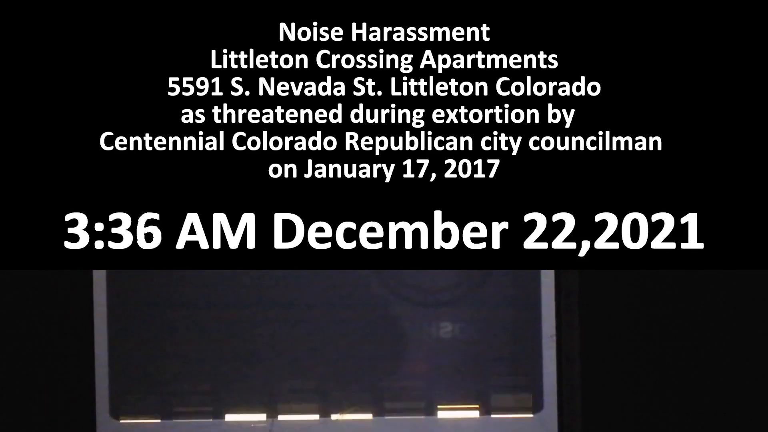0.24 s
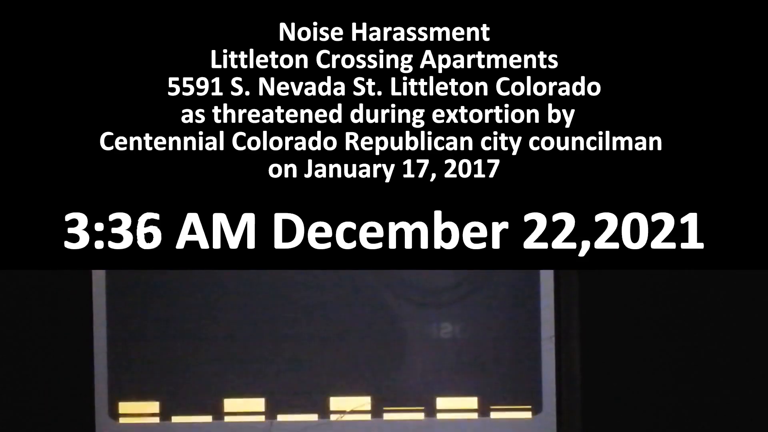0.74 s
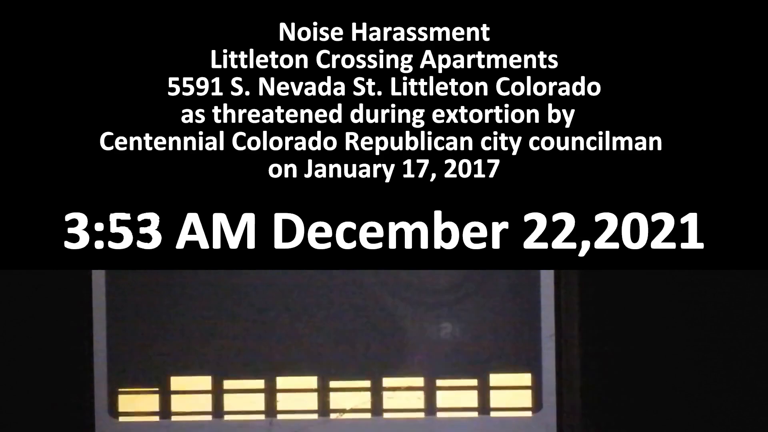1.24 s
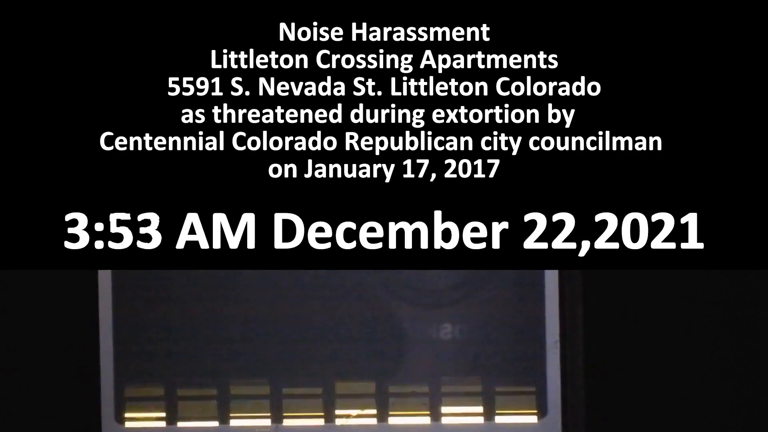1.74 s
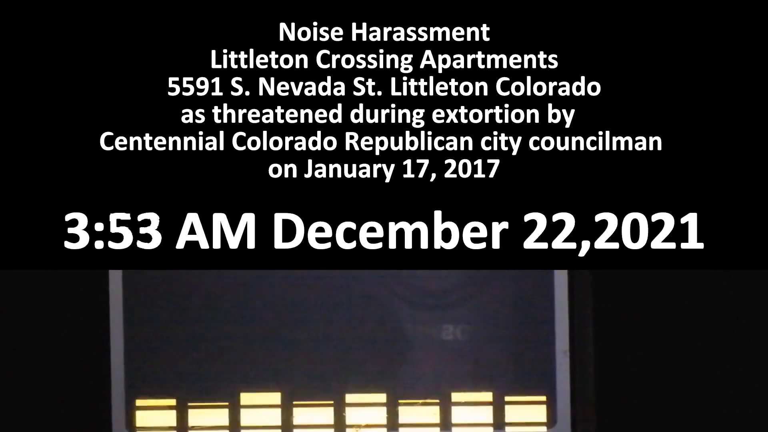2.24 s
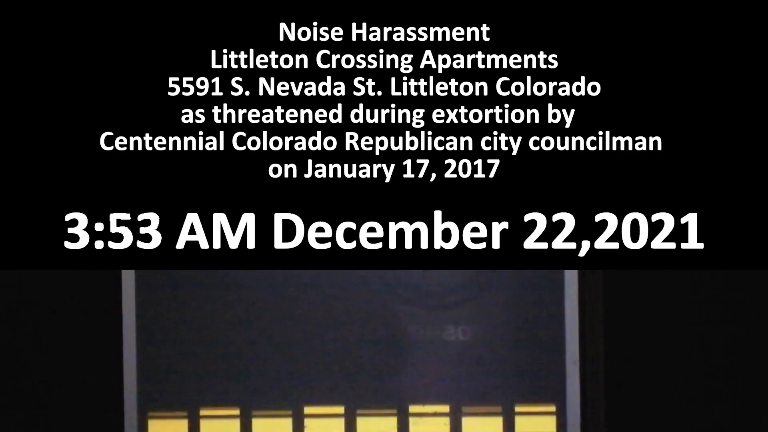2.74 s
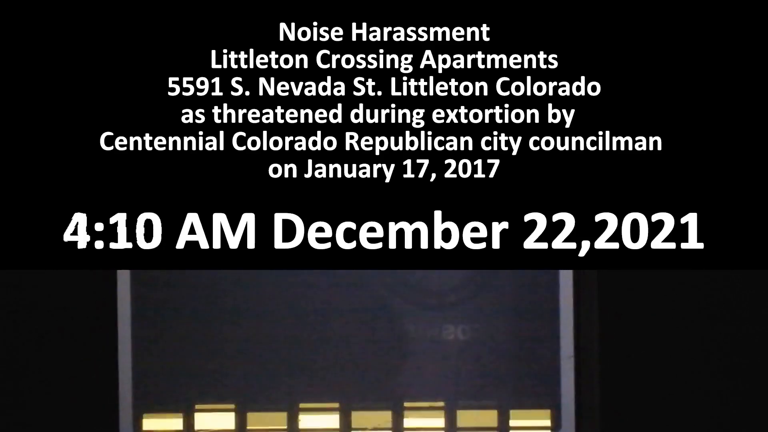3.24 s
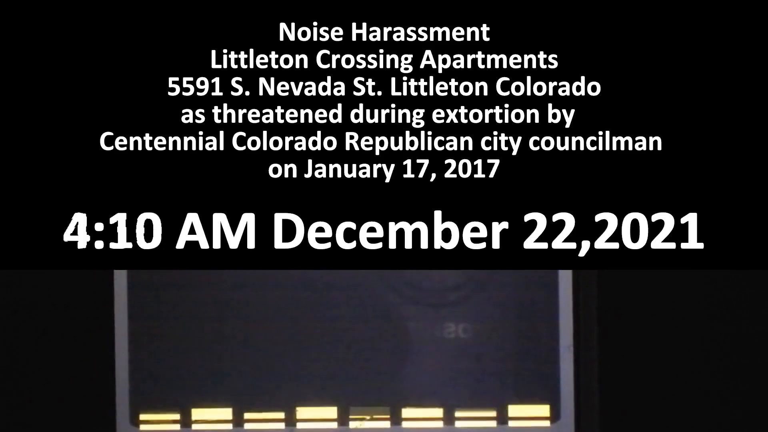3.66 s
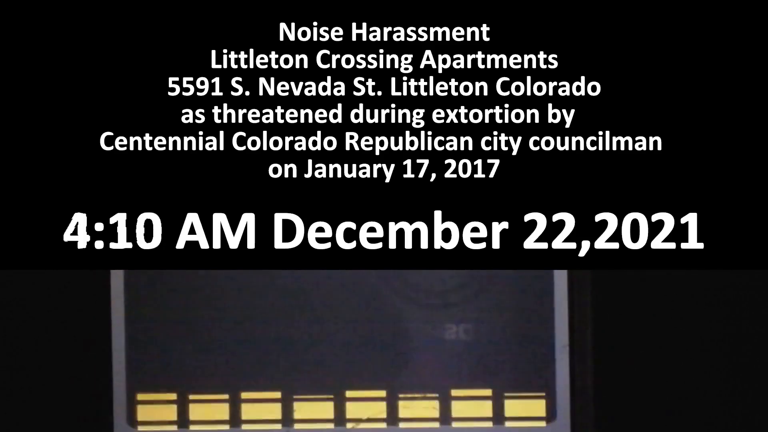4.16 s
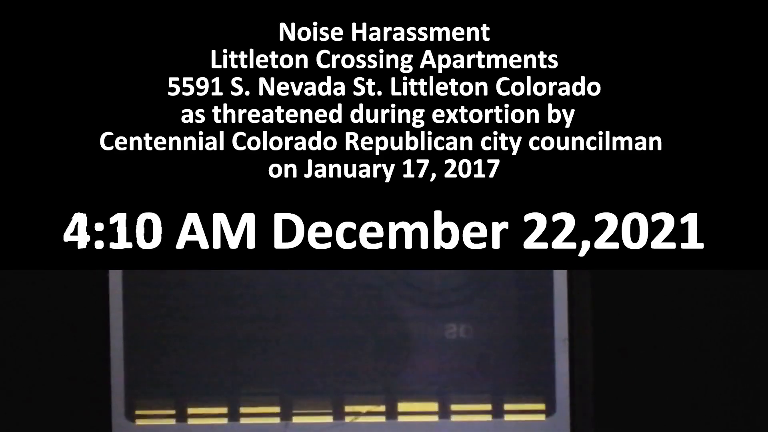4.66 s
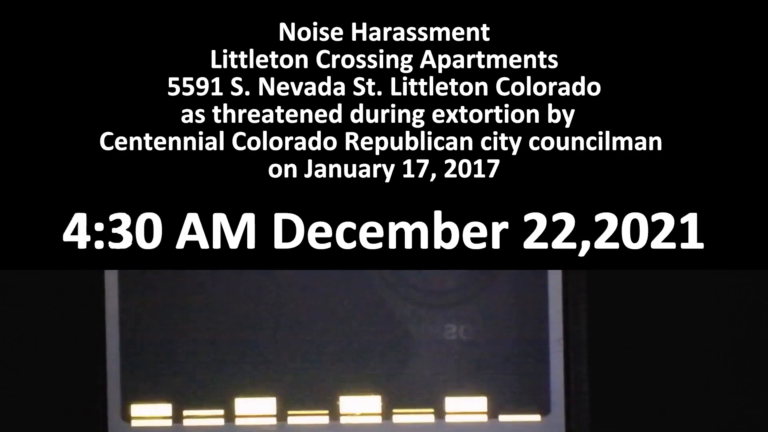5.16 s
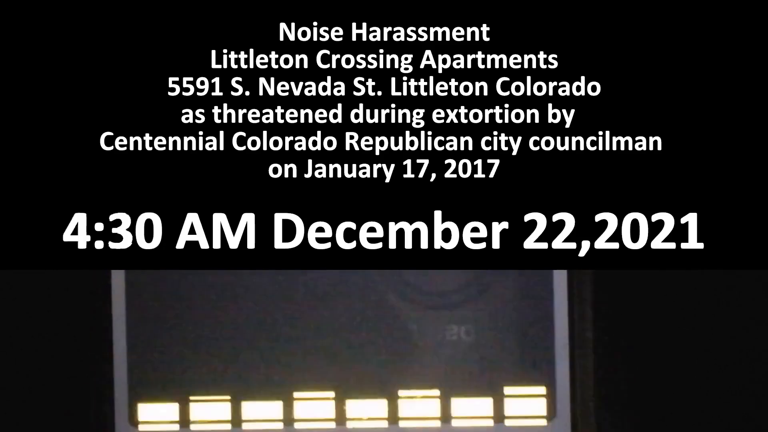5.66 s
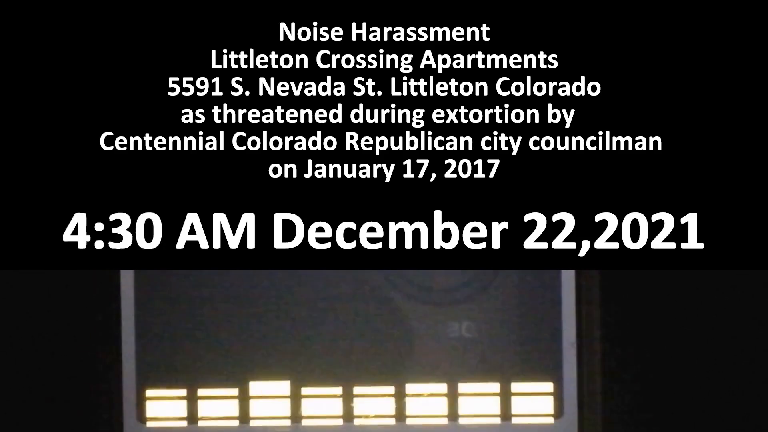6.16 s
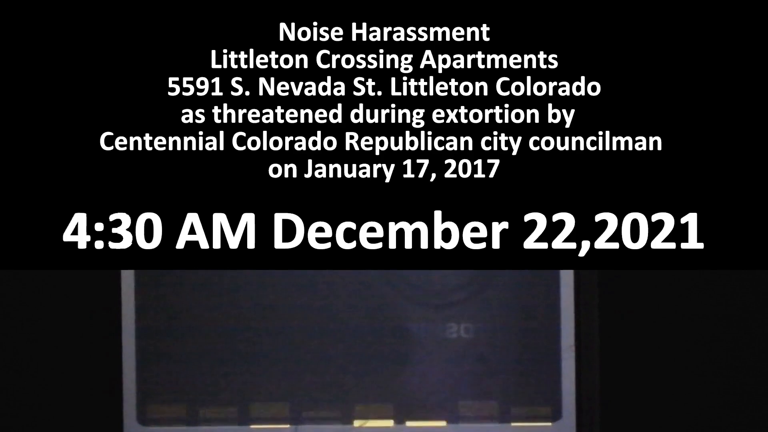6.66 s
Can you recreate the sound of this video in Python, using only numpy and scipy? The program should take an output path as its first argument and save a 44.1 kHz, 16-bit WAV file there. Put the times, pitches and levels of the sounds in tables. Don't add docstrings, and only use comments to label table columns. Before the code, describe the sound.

Deep, throbbing refrigeration drone with soft duct air; after five seconds a motor cuts out, bumps heavily, winds down, and a thinner drone continues.

```python
import sys
import numpy as np
from scipy import signal
from scipy.fft import rfft, irfft, next_fast_len
from scipy.io import wavfile
from scipy.ndimage import uniform_filter1d, map_coordinates

SR = 44100
rng = np.random.default_rng(int(sys.argv[2]) if len(sys.argv) > 2 else 0)


def to_wav(s):
    ch = np.atleast_2d(s).T
    pcm = np.round(np.clip(ch, -1, 1) * 32767)
    wavfile.write(sys.argv[1], SR, pcm.astype(np.int16))


def volts_from_decibels(level):
    exponent = np.asarray(level, float) / 20
    return 10 ** exponent


N = 303849

PULL_HZ, PULL_START_TURNS = 119.99, -.47
SWITCH_OFF_S, SLOWING_S = 5.23, 5.185
SHAFT_SWAY_DB, FAN_SWAY_DB = .4, 1.2


def seconds():
    return np.arange(N) / SR


def unit(x):
    return x / np.sqrt(np.mean(x ** 2) + 1e-20)


def along(points, hz):
    f, v = np.transpose(points)
    return np.interp(np.log(hz + 1), np.log(f + 1), v)


def wobble(knots_per_s):
    knots = rng.standard_normal(int(N * knots_per_s / SR) + 4)
    return map_coordinates(knots, [np.arange(N) * knots_per_s / SR])


def filtered(x, response):
    m = next_fast_len(N + 8192)
    return irfft(rfft(x, m) * response(np.fft.rfftfreq(m, 1 / SR)), m)[..., :N]


def multiples(turns, levels_db, sway_db):
    tones = []
    for k, db in enumerate(levels_db, start=1):
        level = volts_from_decibels(db + sway_db * wobble(3))
        tones.append(level * np.cos(2 * np.pi * k * turns))
    return np.array(tones)


def rings(events, attack_s):
    out = np.zeros(N)
    for start_s, db, hz, t60_s in events:
        age = np.maximum(seconds() - start_s, 0)
        envelope = volts_from_decibels(db - 60 * age / t60_s) * (1 - np.exp(-age / attack_s))
        out += envelope * np.sin(2 * np.pi * hz * age)
    return out


def swell(t, peak_s, rise_s, hold_s, fall_s):
    return np.exp(-np.maximum(peak_s - t, 0) / rise_s - np.maximum(t - peak_s - hold_s, 0) / fall_s)


def near_compressor():
    return near_shaft() + near_pull() + floor_shudder() + casing_bumps()


# peak level in dB of multiple 1, 2, 3, .. of the rotation.
NEAR_SHAFT_DB = [-17, -26, -37, -32.5, -57, -50]


def near_shaft():
    t = seconds()
    age = np.maximum(t - SLOWING_S, 0)
    braked_share, brake_s, coast_s = .14, .11, .5
    speed = braked_share * np.exp(-(age / brake_s) ** 2) + (1 - braked_share) * np.exp(-age / coast_s)
    stall_share, stall_db_per_share = .42, 219.5
    stall = volts_from_decibels(-stall_db_per_share * np.maximum(stall_share - speed, 0))
    floor_mode_share, off_mode_db = .86, -8
    off_mode = 1 / (1 + np.exp((speed - floor_mode_share) / .02))
    knock = volts_from_decibels(0.5 + off_mode_db * off_mode) * speed ** 1.5 * stall
    surge = swell(t, peak_s=5.25, rise_s=.04, hold_s=.1, fall_s=.015)
    surge = volts_from_decibels(13) * surge * (1 - np.exp(-age / 0.013))
    upper = volts_from_decibels(-.5) * speed ** 2.2 * stall + surge
    turns = -.295 + np.cumsum(59.26 * speed) / SR
    shaft = multiples(turns, NEAR_SHAFT_DB, SHAFT_SWAY_DB)
    return knock * shaft[0] + upper * shaft[1:].sum(axis=0)


# peak level in dB of multiple 1, 2, 3 of the pull.
NEAR_PULL_DB = [-16.2, -41, -55]


def near_pull():
    t = seconds()
    current = volts_from_decibels(-60 * np.maximum(t - SWITCH_OFF_S, 0) / .62)
    pull = multiples(PULL_START_TURNS + PULL_HZ * t, NEAR_PULL_DB, SHAFT_SWAY_DB)
    return current * pull.sum(axis=0)


# frequency in Hz, width in Hz, level in dB.
JOISTS = [(55, 4.7, -3), (88, 36, 4), (147, 31, -6), (190, 26, -3.5), (239, 18, -12), (279, 30, -12.5)]


def floor_shudder():
    def floor(hz):
        response = 0
        for k, (mode_hz, width_hz, db) in enumerate(JOISTS):
            damping = 1j * hz * width_hz
            response = response + (-1) ** k * volts_from_decibels(db) * damping / (mode_hz * mode_hz - hz * hz + damping)
        return response * (hz < 320)

    rest_db, shudder_db, t60_s = -55.5, -23, 1.8
    settling = swell(seconds(), peak_s=5.22, rise_s=.015, hold_s=.22, fall_s=t60_s / np.log(1000))
    shaking = volts_from_decibels(rest_db) + volts_from_decibels(shudder_db) * settling
    return shaking * unit(filtered(rng.standard_normal(N), floor))


# start in seconds, peak level in dB, frequency in Hz, T60 in seconds.
BUMPS = [
    (5.2175, -5.5, 140, 0.094),
    (5.235, -24.5, 266, 0.24),
    (5.29, -10.5, 190, 0.35),
    (5.322, -10, 84, .3),
    (5.36, -18, 127, .05),
    (5.41, -14, 65.7, .25),
    (5.468, -12, 88, 0.58),
    (5.585, -19, 92.7, 0.61),
    (6.49, -18, 64.3, 0.59),
]


def casing_bumps():
    return rings(BUMPS, attack_s=0.0047)


# peak level in dB of multiple 1, 2, 3, .. of the rotation.
FAR_SHAFT_DB = [-27.5, -29, -33.5, -49]
# peak level in dB of multiple 1, 2, 3 of the pull.
FAR_PULL_DB = [-20, -45, -48]


def far_compressor():
    t = seconds()
    shaft = multiples(-.27 + 59.555 * t, FAR_SHAFT_DB, SHAFT_SWAY_DB)
    pull = multiples(PULL_START_TURNS + PULL_HZ * t, FAR_PULL_DB, SHAFT_SWAY_DB)
    return pull.sum(axis=0) - shaft.sum(axis=0)


# peak level in dB of multiple 1, 2, 3 of the blade rate.
BLOWER_DB = [-29, -32, -53]
# peak level in dB of multiple 1, 2, 3, .. of the blade rate.
FAN_DB = [-46, -41.5, -37, -62.5, -58, -62.5, -57, -56.5, -56, -64.5, -65.5, -55.5]


def fans():
    t = seconds()
    blower = multiples(84.72 * t + .1 * wobble(.5), BLOWER_DB, FAN_SWAY_DB)
    fan = multiples(84.04 * t + 0.0039 * wobble(0.78), FAN_DB, FAN_SWAY_DB)
    return blower.sum(axis=0) + fan.sum(axis=0)


# frequency in Hz, peak level in dB.
RATTLES = [(299.2, -45.5), (361.4, -44.5), (2090, -70.5), (2956, -71.5), (4246, -81.5)]


def panels():
    out = np.zeros(N)
    for hz, db in RATTLES:
        level = volts_from_decibels(db + 3 * wobble(3.4))
        out += level * np.cos(2 * np.pi * (hz * seconds() + 0.19 * wobble(2.7)))
    return out


# start in seconds, peak level in dB, frequency in Hz, T60 in seconds.
TICK = [
    (.3412, -47, 7320, .014),
    (.3409, -52, 6500, .01),
    (.3405, -51, 3400, .012),
]


def tick():
    return rings(TICK, attack_s=.0004)


# frequency in Hz, density in dB per Hz.
AIR = [(20, -9.5), (45, -4), (70, 0), (110, 0), (190, 1.5), (300, -9.5), (500, -15), (620, -20),
       (1000, -26.5), (2080, -32.5), (2150, -35), (3500, -40.5), (4300, -50), (6000, -60.5)]
# frequency in Hz, width in Hz, level in dB over the rush.
DUCTS = [(134.3, 15, 4), (165, 11, -5), (179.7, 5.8, 4), (196, 36, -3.5), (277, 11, 2), (379, 30, 2.5),
         (401.6, 24, 7), (452.6, 51, 10.5), (453, 15, 2.5), (532, 21, 3), (564, 11, -4), (590, 34, 3.5),
         (648, 22, 2.5), (756, 28, 2), (1073, 53, 3), (1370, 27, 2.5), (1896, 40, 3.5), (2093, 36, 5)]


def air(level_db=-30, patchy_db=0.34, ripple_db=1.1):
    z = signal.stft(rng.standard_normal(N), nperseg=1024)[2]
    field = uniform_filter1d(rng.standard_normal(z.shape), size=6, axis=0)
    field = uniform_filter1d(field, size=8, axis=1)
    noise = signal.istft(z * volts_from_decibels(patchy_db * unit(field)), nperseg=1024)[1][:N]
    modes = rng.standard_normal(1200)

    def duct_response(hz):
        ripple = ripple_db * map_coordinates(modes, [hz / 18], mode="mirror") * (hz > 280)
        ducts = sum(db / (1 + (2 * (hz - c) / w) ** 2) for c, w, db in DUCTS)
        return volts_from_decibels(along(AIR, hz) + ducts + ripple)

    rush = filtered(noise, duct_response)
    low_hz, high_hz, near_share, fade_s = 125, 310, 0.27, .15
    low = filtered(rush, lambda hz: 1 / (1 + (low_hz / (hz + 1)) ** 8 + (hz / high_hz) ** 8))
    gone = near_share * (1 - np.exp(-np.maximum(seconds() - SWITCH_OFF_S, 0) / fade_s))
    return volts_from_decibels(level_db) * (rush - gone * low) / np.std(filtered(rush, lambda hz: hz > 280))


def scene():
    return (near_compressor() + far_compressor() + fans() + panels() + tick() + air())[None]


# frequency in Hz, density in dB per Hz.
HISS = [(3000, -4), (5000, -4), (7000, -6), (9000, -8), (11000, -7.5), (13600, -3.5), (14200, -9.5),
        (15200, 3), (15680, -0.5), (15800, -27.5)]


def electronics():
    shape = lambda hz: volts_from_decibels(along(HISS, hz)) * (hz > 2500) * (hz < 15850)
    hiss = unit(filtered(rng.standard_normal(N), shape))
    whine = volts_from_decibels(-80.0) * np.cos(2 * np.pi * 15674.3 * seconds())
    return volts_from_decibels(-64) * hiss + whine


def roll_off(x):
    return signal.sosfilt(signal.butter(12, 15760, fs=SR, output="sos"), x)


def record(dry):
    notch_hz, width_hz = 7850, 180
    notch = lambda hz: np.abs(hz - notch_hz) / np.hypot(hz - notch_hz, width_hz)
    mix = filtered(dry + electronics(), lambda hz: notch(hz) ** 1.7)
    return roll_off(mix)


dry = scene()
out = record(dry)
to_wav(out)
```